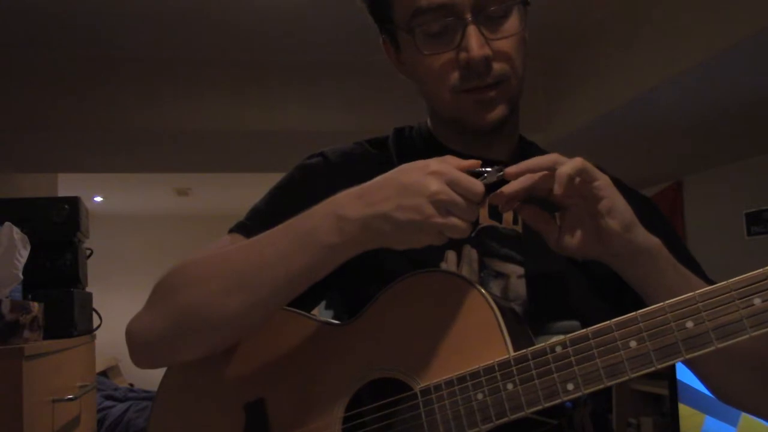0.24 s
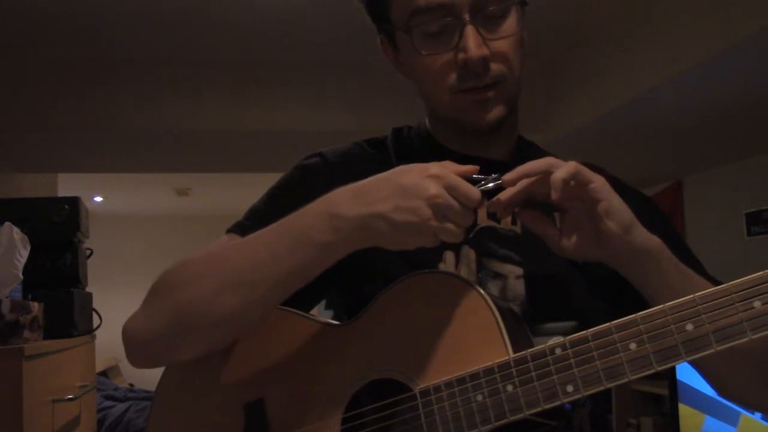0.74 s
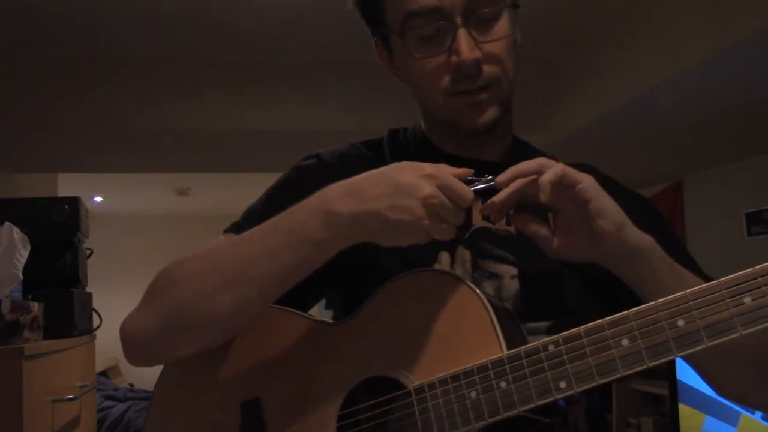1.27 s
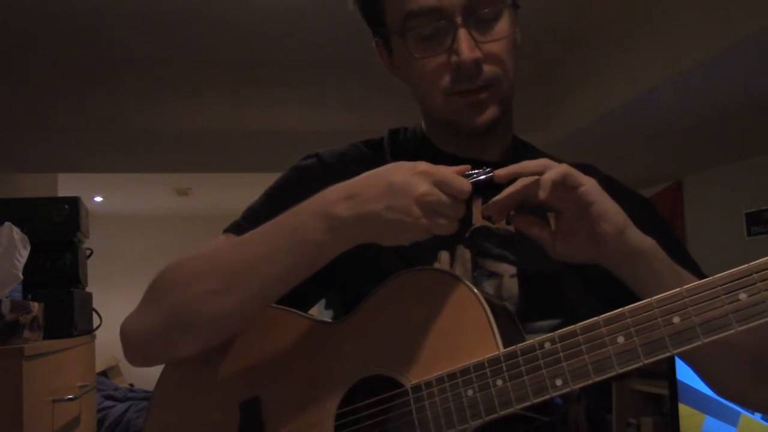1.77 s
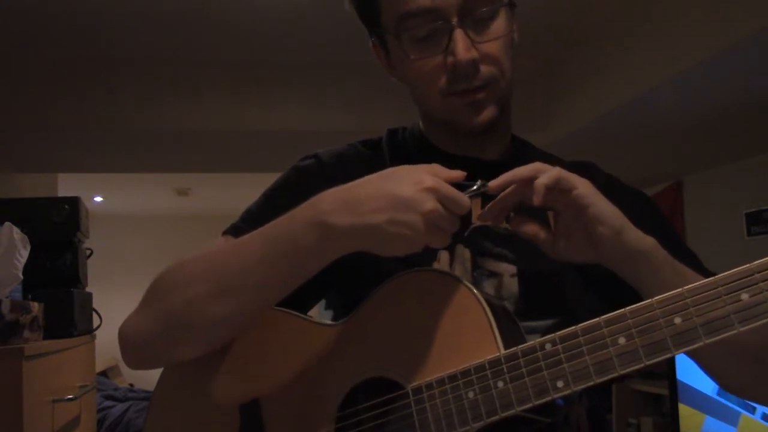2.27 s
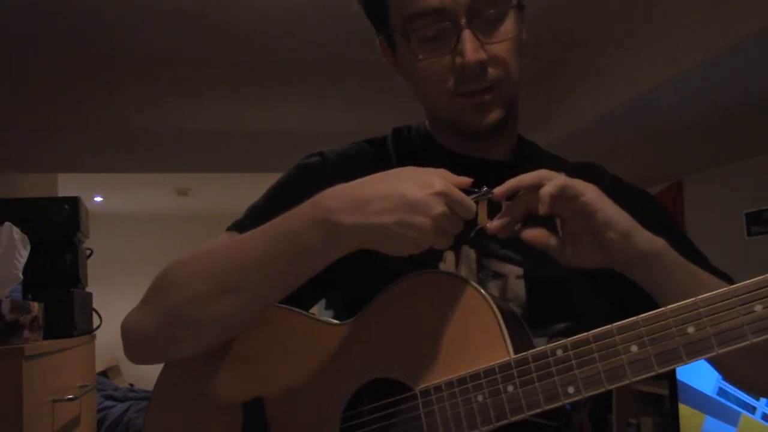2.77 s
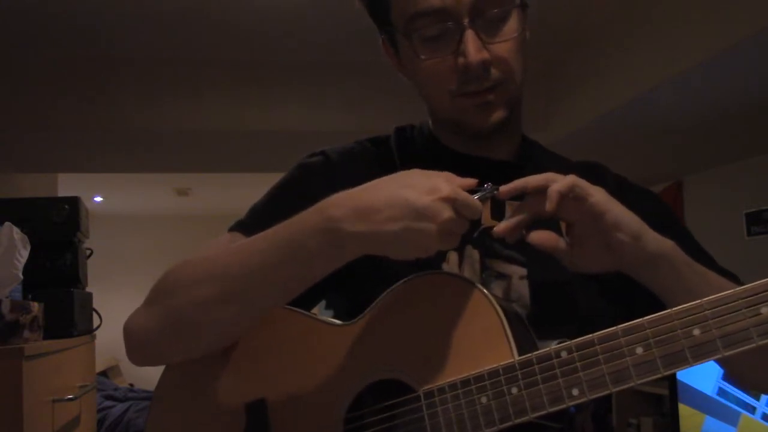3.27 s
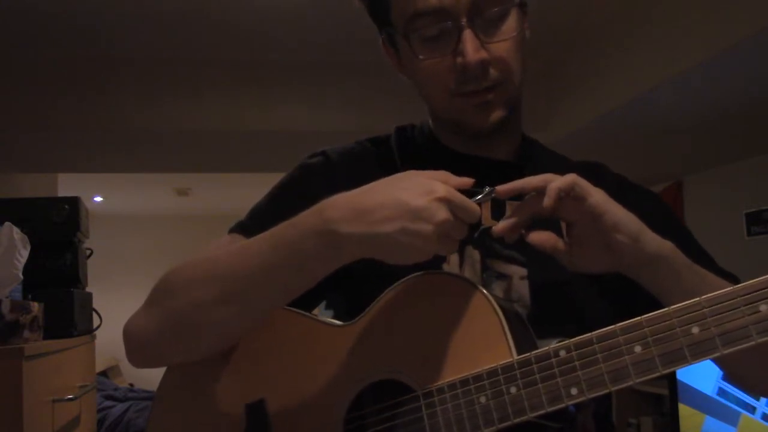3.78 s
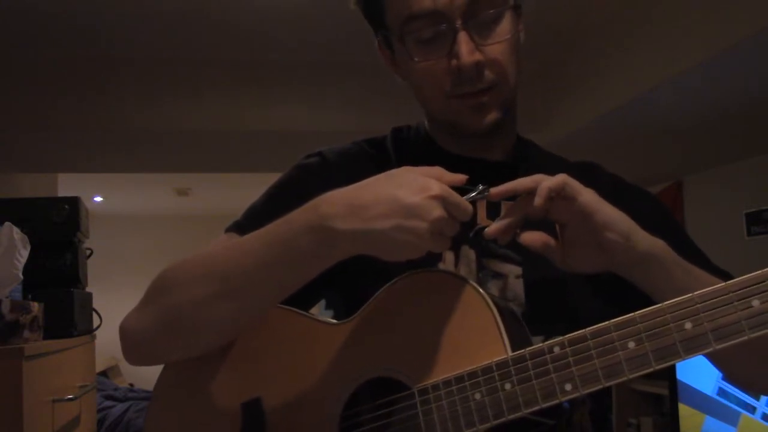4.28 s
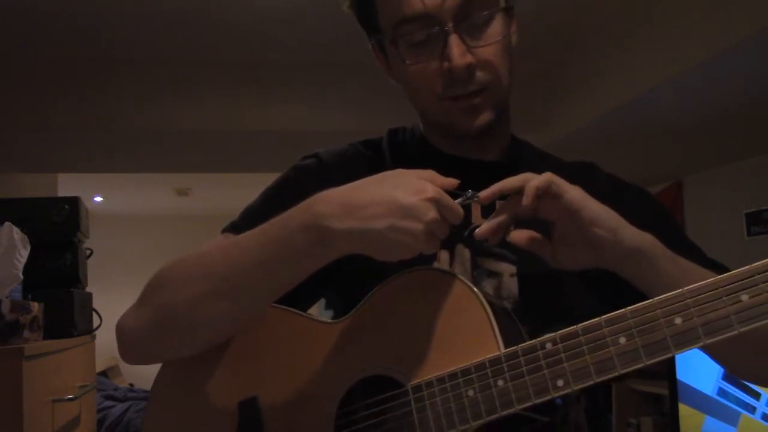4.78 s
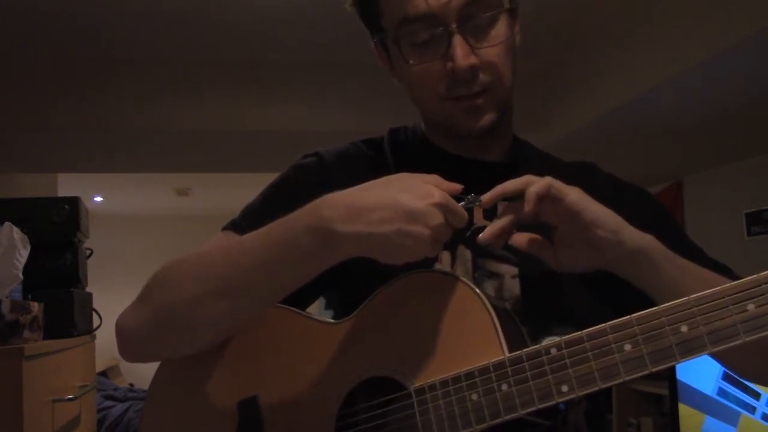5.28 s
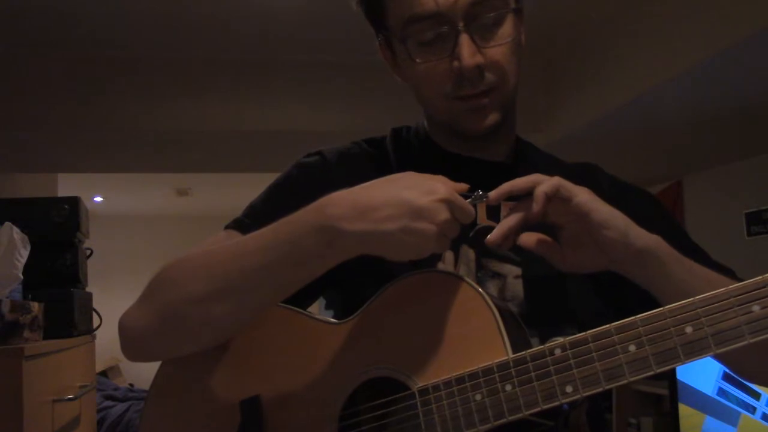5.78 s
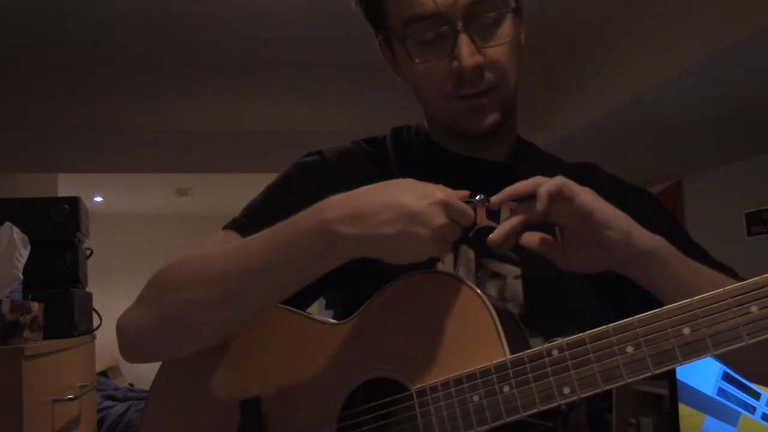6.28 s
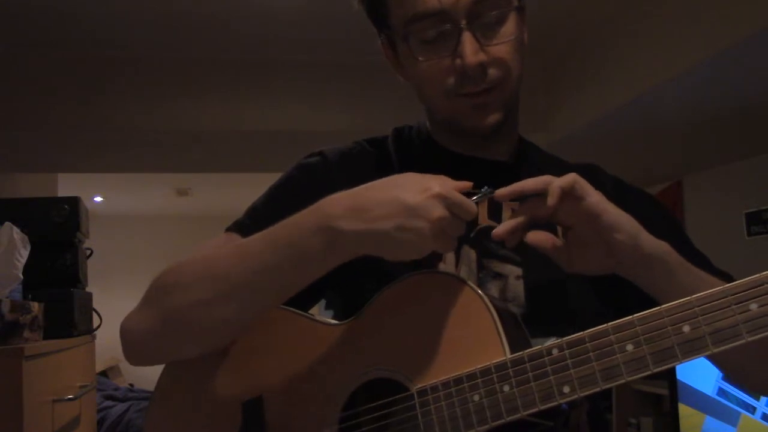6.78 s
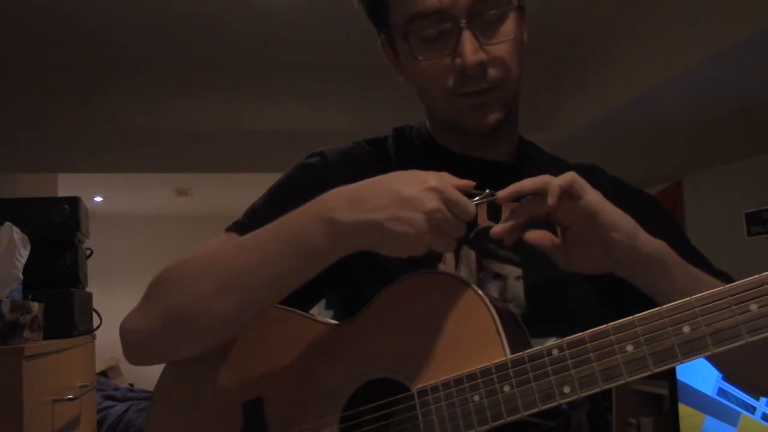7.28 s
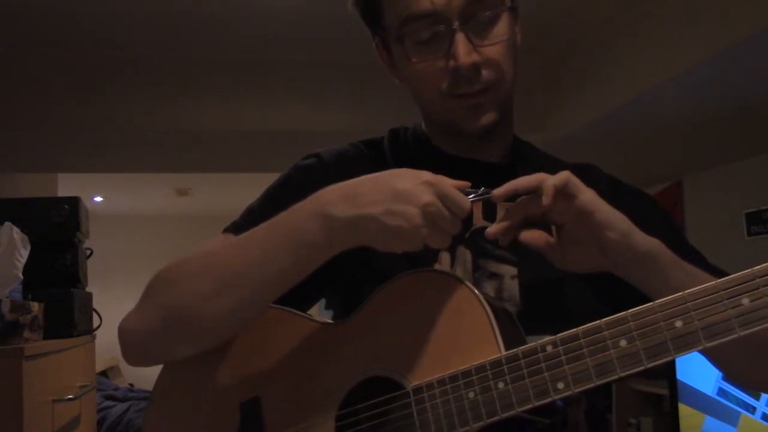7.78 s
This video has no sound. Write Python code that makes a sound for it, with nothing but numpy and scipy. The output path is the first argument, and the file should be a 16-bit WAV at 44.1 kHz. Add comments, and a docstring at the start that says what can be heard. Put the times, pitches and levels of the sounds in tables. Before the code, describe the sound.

A steady low rumble of ventilation with a light hiss runs throughout, joined by the faint, even buzz of a small motor nearby. The room is small and softly furnished, with very little echo. Close to the microphone, steel nail clippers tick faintly against a fingernail between about 0.3 and 0.5 seconds. At 1.6 seconds comes the first snip, a loud, sharp, very bright click as the nail cracks and the jaws snap shut with a brief steel ring. A few tiny ticks follow between 1.9 and 2.5 seconds, then a slightly crunchier second snip at 3 seconds. Only the hum is heard until a faint tick and a third crunchy snip at 6.2 seconds. The fourth and loudest snip lands at 7.9 seconds, with a slight dull knock inside the click.

```python
"""A small, soft-furnished room: nail clippers snip four times. In each cut the nail cracks and
splinters, then the jaws slam shut and the steel rings; the loudest snips carry a dull overload thump.
Between cuts the steel ticks faintly on the nail. Air handling rumbles in the room's low modes;
a small motor close to the microphones buzzes steadily."""
import sys
import numpy as np
from scipy import signal
from scipy.fft import rfft, irfft, next_fast_len
from scipy.io import wavfile

SR = 44100
rng = np.random.default_rng(int(sys.argv[2]) if len(sys.argv) > 2 else 0)


def unload_wav(signal):
    """Save mono or channel-first audio to the path in sys.argv[1] as 16-bit WAV at rate SR, clipped to [-1, 1]."""
    wavfile.write(
        sys.argv[1],
        SR,
        np.round(np.clip(np.atleast_2d(signal).T, -1, 1) * 32767).astype(np.int16),
    )


N = 354563


def cuts():
    """The nail cracks, splinters for a millisecond while the jaws close, and the jaws slam together."""
    # Each row: start in seconds, level in dB, dull part, steel ring, nail crunch and lever ping in dB,
    # microphone resonance in Hz, overload thump in dB, thump low cut in Hz, room in dB.
    snips = [(1.5885, -.5, -1, 1, 3, 0, 15000, -12.5, 2000, -19.5),
             (3.0088, -1.5, -3, 3.5, 9, 0, 14500, -23, 2800, -25),
             (6.1882, -2, -2, 2, 9, 9, 14850, -29, 2200, -26),
             (7.9113, 3, -2, 2.5, 1, 0, 14600, -14.5, 400, -25.5)]
    jaws_meet_s, thump_hz = .00095, 5000
    break_db, splinter_db = -8, -17   # re the jaws' slam
    out, gap = np.zeros((2, N)), round(jaws_meet_s * SR)
    pulse_phase = 2 * np.pi * thump_hz * np.arange(256) / SR
    pulse = pulse_phase * np.exp(1 - pulse_phase)   # one-sided
    for start_s, db, dull_db, ring_db, crunch_db, ping_db, mic_hz, thump_db, low_cut_hz, room_db in snips:
        # The direct sound is thinner than its reflections; the microphone resonance is stronger off axis.
        direct = cut_ring(dull_db - 6, ring_db - 2.5, crunch_db, ping_db=0, mic_db=3, mic_hz=mic_hz - 400)
        direct *= from_db(db - .5)
        reflected = from_db(db) * cut_ring(dull_db, ring_db, crunch_db, ping_db, mic_db=6.5, mic_hz=mic_hz)
        thump = signal.lfilter(*signal.butter(2, low_cut_hz, "high", fs=SR), pulse)
        splinters = from_db(splinter_db) * np.linspace(.3, 1, gap) * rng.standard_normal(gap)
        force = np.append(splinters, 1)   # ends in the slam
        force[0] = from_db(break_db)
        add(out, np.convolve(force, direct)[None], start_s)
        add(out, signal.fftconvolve(echoes(), np.convolve(force, reflected)[None]), start_s)
        add(out, signal.fftconvolve(room(room_db), reflected[None]), start_s + jaws_meet_s)
        add(out, -from_db(thump_db) * thump[None], start_s + jaws_meet_s)
    return out


def cut_ring(dull_db, ring_db, crunch_db, ping_db, mic_db, mic_hz):
    """Impulse response of clippers, nail and capsule; grip and nail set lows, crunch and steel ring."""
    # Steel ring and capsule resonance together. Each row: frequency in Hz, relative level in dB.
    colour = [(600, -54), (1500, -42), (2200, -32), (3500, -30), (5000, -26), (6200, -22), (7000, -20.5),
              (8200, -15.5), (9500, -19), (11000, -18), (12800, -7), (14400, -2), (15400, -3), (16500, -15),
              (20000, -45)]
    # Resonances. Each: centre in Hz, width in Hz.
    steel_modes = [(7400, 200), (8250, 500)]
    nail_modes = [(2800, 300), (3750, 300), (4750, 300)]   # nail and fingers
    lever_mode = (6450, 200)   # only some grips leave it free
    dull_below_hz, mic_width_hz = 5850, 1200
    hz = np.fft.rfftfreq(1024, 1 / SR)
    dull = dull_db / (1 + (hz / dull_below_hz) ** 4)
    ring = ring_db * sum(bump(hz, *mode) for mode in steel_modes)
    crunch = crunch_db * sum(bump(hz, *mode) for mode in nail_modes)
    ping = ping_db * bump(hz, *lever_mode)
    bright = mic_db * bump(hz, mic_hz, mic_width_hz)   # microphone resonance near 14.5 kHz
    return causal_response(at_hz(colour, hz) + dull + ring + crunch + ping + bright)


def ticks():
    """Steel touches nail: a tiny crack and a short ring of the nearest modes, with a little room."""
    # Each row: start in seconds, level in dB, favoured frequency in Hz.
    touches = [(.2525, -44, 5500), (.257, -46, 5300), (.3185, -50, 11200), (.364, -62, 10500),
               (.493, -50, 13800), (1.5787, -44, 13800), (1.905, -62, 11000), (2.0745, -40, 7000),
               (2.0785, -55, 12000), (2.279, -48, 8800), (2.318, -59, 14500), (2.518, -58, 5500),
               (6.1265, -44.5, 15500)]
    # Mode frequencies in Hz.
    modes_hz = [5500, 6500, 10300, 12300, 14600]
    ring_t60_s, mode_db_per_octave = .004, -26
    crack_t60_s, crack_db = .003, -14
    out, t = np.zeros((2, N)), np.arange(1024) / SR
    modes = np.sin(2 * np.pi * np.outer(modes_hz, t))
    path = room(room_db=-29)
    path[:, 0] = 1   # direct sound
    for start_s, db, favoured_hz in touches:
        crack = from_db(crack_db) * rng.standard_normal(len(t)) * dying(t, crack_t60_s)
        octaves_off = np.abs(np.log2(np.array(modes_hz) / favoured_hz))
        ring = from_db(mode_db_per_octave * octaves_off) @ modes * dying(t, ring_t60_s)
        add(out, from_db(db) * signal.fftconvolve(path, (ring + crack)[None]), start_s)
    return out


def echoes():
    """First echoes off body and furniture, thin in the lows, a little different as the hands move."""
    # Each row: delay in ms, left level in dB, right level in dB.
    taps = [(1.7, -14, -14), (3.4, -9, -14), (5.0, -10, -9.5), (7.5, -12, -15.5), (14.3, -15, -15)]
    scatter_db, low_cut_hz = 1, 2200
    paths = np.zeros((2, 1024))
    for delay_ms, left_db, right_db in taps:
        gains = from_db([left_db, right_db] + scatter_db * rng.standard_normal(2))
        paths[:, round(delay_ms * SR / 1000)] += gains
    return signal.lfilter(*signal.butter(1, low_cut_hz, "high", fs=SR), paths)


def room(room_db, size=16384):
    """Dense reflections that build up, then die fast at first and slower later."""
    # Each row: frequency in Hz, late T60 in seconds.
    late_t60 = [(2000, 0.2), (5000, 0.24), (9000, 0.21), (15000, 0.175)]
    rise_s, early_t60_s, late_db = .0026, .031, -4.5
    t = np.arange(size) / SR
    white, late = rng.standard_normal((2, size)), np.zeros((2, size))
    edges_hz = 1000 * 2 ** np.arange(0, 4.3, .5)
    for k, (low_hz, high_hz) in enumerate(zip(edges_hz, edges_hz[1:])):
        band = signal.sosfilt(signal.butter(2, [low_hz, high_hz], "band", fs=SR, output="sos"), white)
        t60_s = at_hz(late_t60, np.sqrt(low_hz * high_hz))
        late += band * dying(t, t60_s) * (-1) ** k   # signs alternate so band edges add
    early = rng.standard_normal((2, size)) * dying(t, early_t60_s)
    return from_db(room_db) * (early + from_db(late_db) * late) * (1 - np.exp(-t / rise_s))


def at_microphones(sound):
    """Two capsules near the clippers: the treble favours the left and reaches it late."""
    # Each row: frequency in Hz, left minus right in dB.
    balance = [(2000, 0), (5000, 1.5), (11000, 2), (15000, 2.7)]
    # Each row: frequency in Hz, left lag in radians.
    lag = [(7000, 0), (10500, .35), (15000, 1)]
    size = next_fast_len(N)
    hz = np.fft.rfftfreq(size, 1 / SR)
    left = from_db(at_hz(balance, hz) / 2) * np.exp(-.5j * at_hz(lag, hz))
    return irfft(rfft(sound, size) * [left, 1 / left], size)[:, :N]


def air():
    """Air handling: rumble and hiss coloured by the room's modes; the level wanders slightly."""
    # Each row: frequency in Hz, relative noise density in dB.
    spectrum = [(20, -13), (38, -23.5), (74, -2.5), (134, -5.5), (187, -.5), (300, -8), (485, -18),
                (873, -23), (1400, -30.5), (2300, -32), (4000, -40), (5200, -45.5), (9000, -52),
                (16000, -59.5)]
    # Room modes and dips; faint bands in the hiss. Each row: centre in Hz, width in Hz, gain in dB.
    room_modes = [(93, 9.9, 3), (111.3, 15, 6), (165, 7.8, 0.5), (181.2, 6.1, 4.5), (296.4, 110, -7),
                  (320.6, 15, 10.5), (345, 35, 2.5), (365, 40, 3.5), (395, 24, 3), (588, 34.5, 4.5),
                  (764, 15, 5.5), (1282, 42, 3.5)]
    whine = [(5600, 250, 3), (11000, 300, 4)]
    # Each row: frequency in Hz, left-right coherence from 0 to 1.
    coherence = [(25, 0.9), (40, 0.6), (60, 0.97), (130, 0.99), (290, 0.95), (640, 0.8), (1400, 0.56),
                 (3100, 0.4), (6800, 1), (15000, 0.1)]
    # Each row: frequency in Hz, left minus right in dB.
    balance = [(700, 0.2), (1300, 1), (2400, 1), (5000, 2), (8000, 2.5)]
    # Each row: frequency in Hz, left lead in radians.
    left_lead = [(300, 0), (1200, 0.47), (5000, 0.36), (7000, 0)]
    level_db, swell_db, swell_knots_per_s = -36.5, .55, 6.6
    size = next_fast_len(N)
    hz = np.fft.rfftfreq(size, 1 / SR)
    modes_db = sum(db * bump(hz, centre_hz, width_hz) for centre_hz, width_hz, db in room_modes + whine)
    mid, side = rfft(rng.standard_normal((2, size))) * from_db(at_hz(spectrum, hz) + modes_db) * (hz > 15)
    alike = at_hz(coherence, hz)
    mid *= np.sqrt(1 + alike)
    side *= np.sqrt(1 - alike)
    left = from_db(at_hz(balance, hz) / 2) * np.exp(.5j * at_hz(left_lead, hz))
    noise = irfft([(mid + side) * left, (mid - side) / left], size)[:, :N]
    knots = rng.standard_normal(200)
    swell = np.interp(np.arange(N) / SR * swell_knots_per_s, np.arange(len(knots)), knots)
    return from_db(level_db + swell_db * swell) * noise / noise.std()


def motor():
    """One pulse a turn gives harmonics of a steady turning rate; mains hum sounds beside them."""
    # Each row: multiple of the turning rate, rms level in dB before panning.
    harmonics = [(11, -62), (13, -69), (14, -67), (16, -72), (17, -61), (18, -60), (19, -62), (20, -66),
                 (26, -73), (27, -70), (28, -73), (32, -75), (33, -76), (34, -63), (35, -75), (37, -69),
                 (38, -73), (39, -71), (40, -74), (41, -68), (43, -79), (52, -79), (53, -79), (54, -83),
                 (94, -81), (106, -90)]
    # Each row: frequency in Hz, left minus right in dB.
    balance = [(2200, 0.5), (2300, 6)]
    turn_hz, left_lead_rad, slip_rad = 59.185, .5, 1.4
    hum_hz, hum_db = 120, -55
    t, out = np.arange(N) / SR, np.zeros((2, N))
    tones = [(k * turn_hz, db, left_lead_rad) for k, db in harmonics] + [(hum_hz, hum_db, 0)]
    phases_rad = np.cumsum(rng.normal(0, slip_rad, len(tones)))   # each slips against the one before
    for (hz, db, lead_rad), phase_rad in zip(tones, phases_rad):
        pan_db = at_hz(balance, hz)
        amplitude = np.sqrt(2) * from_db([[db + pan_db / 2], [db - pan_db / 2]])
        out += amplitude * np.sin(2 * np.pi * hz * t + phase_rad + [[lead_rad], [0]])
    return out


def from_db(db):
    """Decibels to gain."""
    return 10 ** (np.asarray(db) / 20)


def at_hz(points, hz):
    """Interpolates rows of (Hz, value) on a log-frequency axis."""
    points_hz, values = np.array(points).T
    return np.interp(np.log(np.maximum(hz, 1)), np.log(points_hz), values)


def bump(hz, centre_hz, width_hz):
    """A resonance of height 1."""
    return 1 / (1 + (2 * (hz - centre_hz) / width_hz) ** 2)


def dying(t, t60_s):
    """Gain that falls 60 dB in t60_s."""
    return from_db(-60 * t / t60_s)


def causal_response(level_db):
    """Minimum-phase response of an evenly spaced spectrum, by cepstral folding; peak 1."""
    cepstrum = irfft(np.log(from_db(level_db)))
    cepstrum[1:len(cepstrum) // 2] *= 2
    cepstrum[len(cepstrum) // 2 + 1:] = 0
    response = irfft(np.exp(rfft(cepstrum)))
    return response / np.abs(response).max()


def add(out, sound, start_s):
    """Mixes a sound into both channels at start_s."""
    at = round(start_s * SR)
    out[:, at:at + sound.shape[1]] += sound[:, :N - at]


def scene():
    """Clippers over the room's air and the motor."""
    return at_microphones(cuts() + ticks()) + air() + motor()


def record(dry):
    """Steep low-pass; peaks clip at full scale."""
    stopband_hz = 16000
    low_pass = signal.cheby2(24, 60, stopband_hz, fs=SR, output="sos")
    return np.clip(signal.sosfilt(low_pass, dry), -1, 1)


dry = scene()
out = record(dry)
unload_wav(out)
```